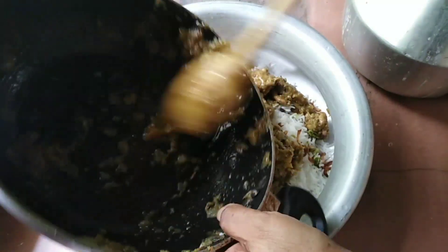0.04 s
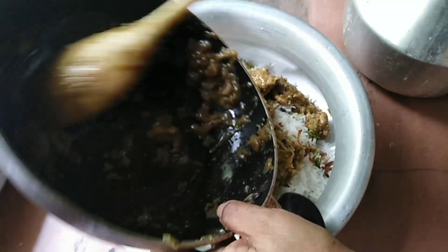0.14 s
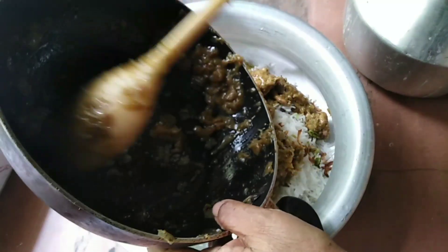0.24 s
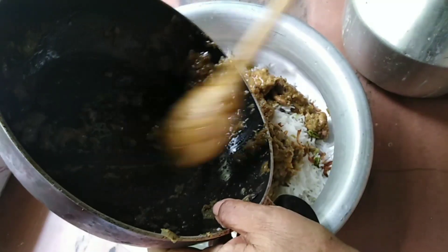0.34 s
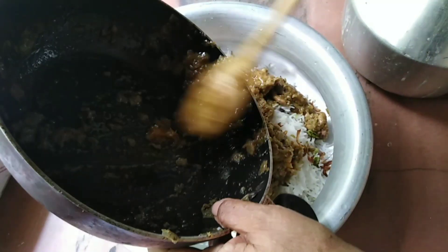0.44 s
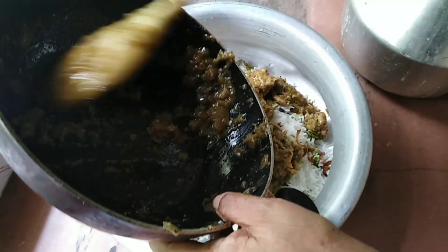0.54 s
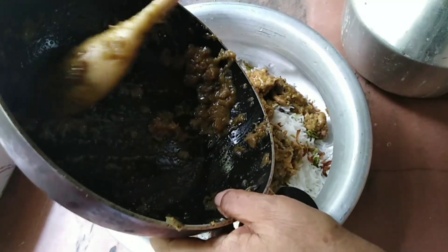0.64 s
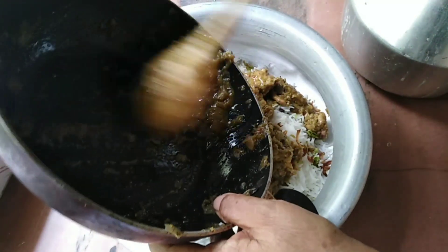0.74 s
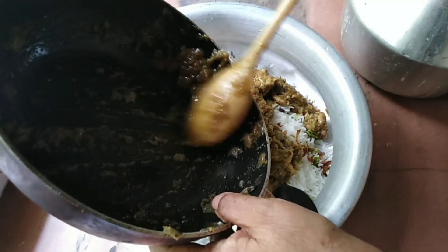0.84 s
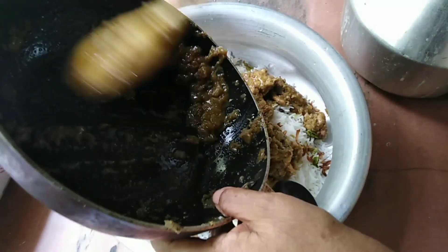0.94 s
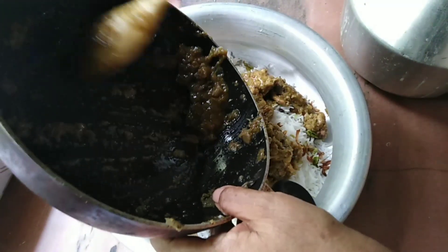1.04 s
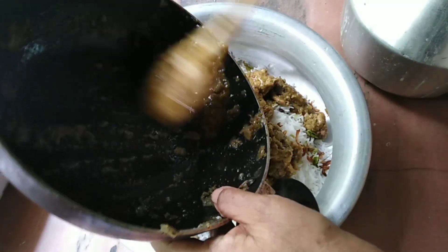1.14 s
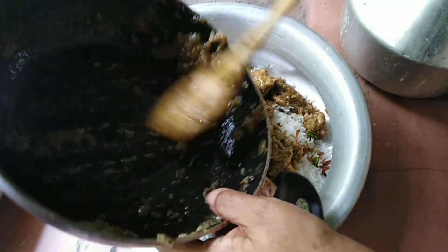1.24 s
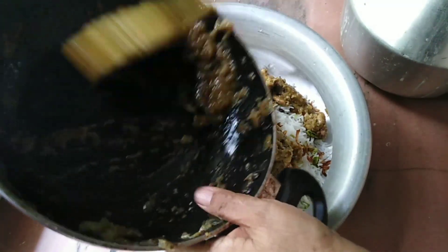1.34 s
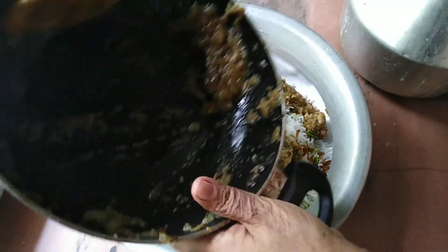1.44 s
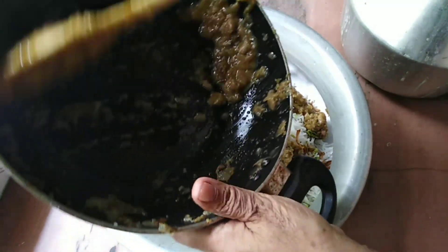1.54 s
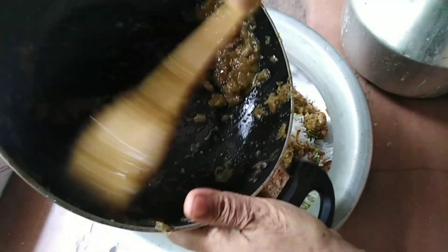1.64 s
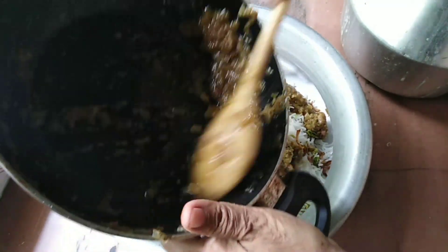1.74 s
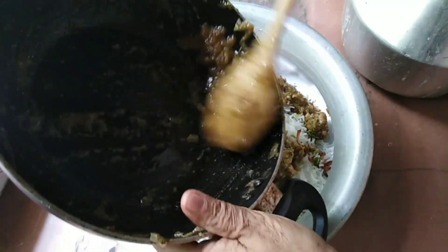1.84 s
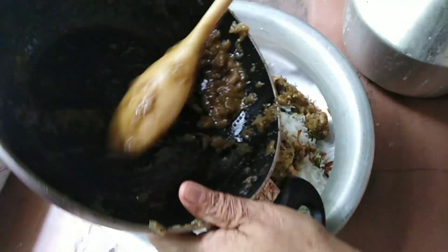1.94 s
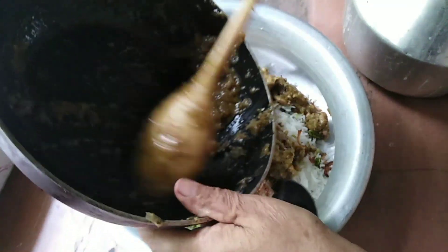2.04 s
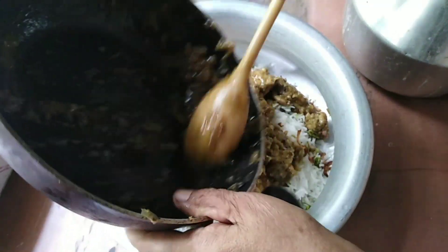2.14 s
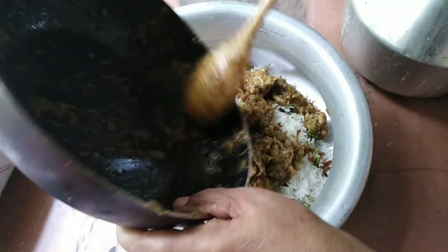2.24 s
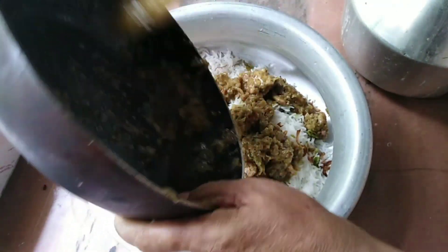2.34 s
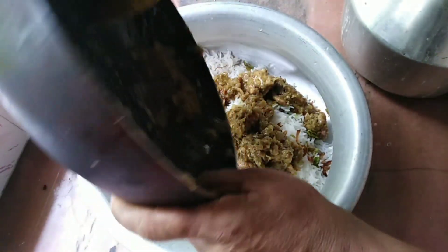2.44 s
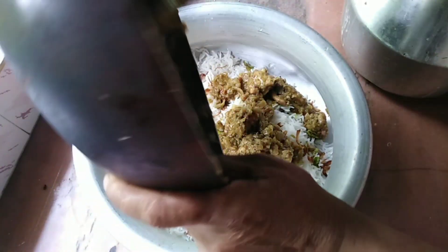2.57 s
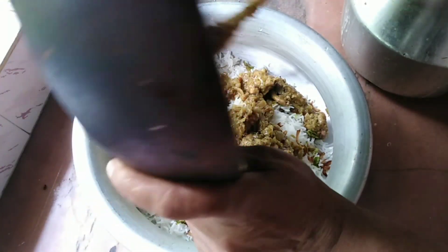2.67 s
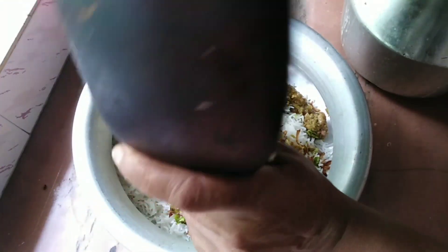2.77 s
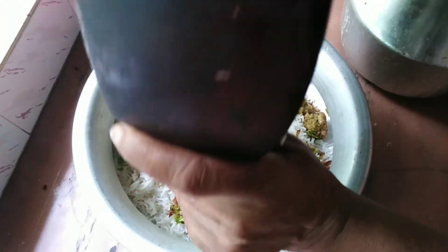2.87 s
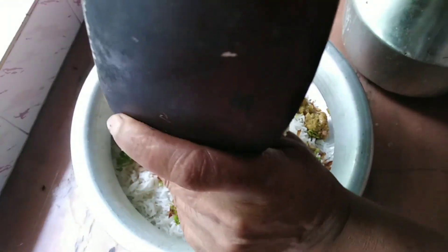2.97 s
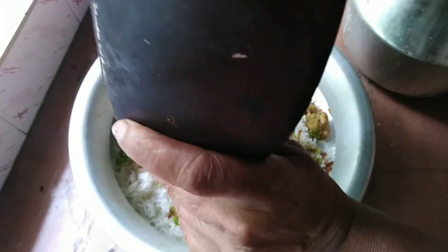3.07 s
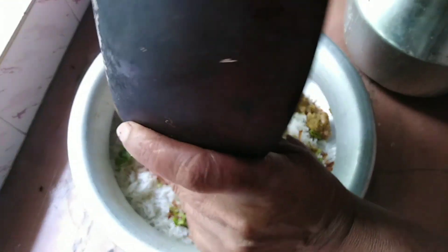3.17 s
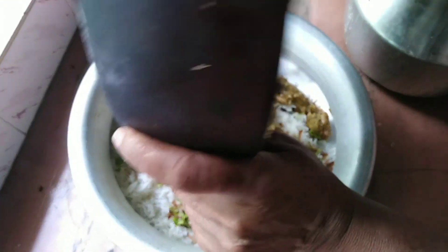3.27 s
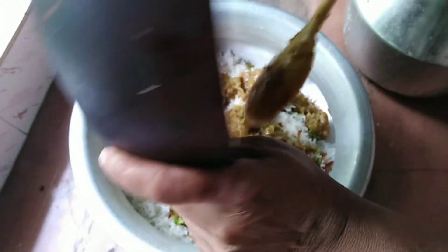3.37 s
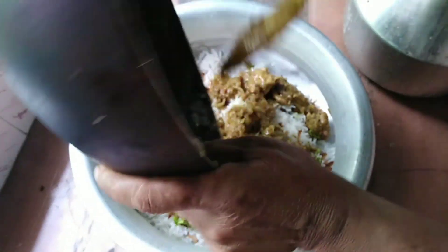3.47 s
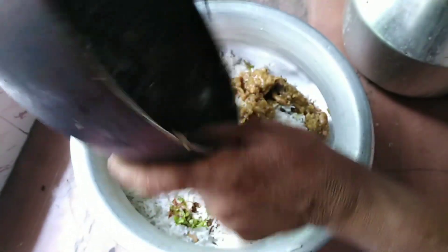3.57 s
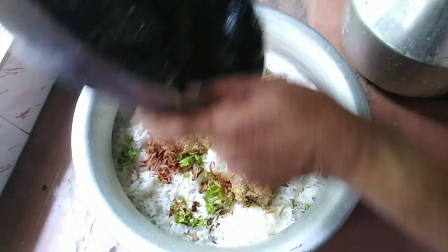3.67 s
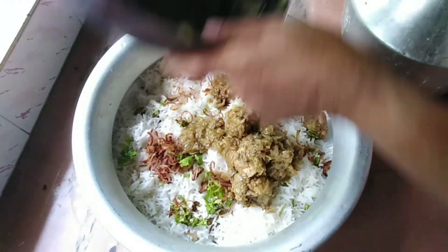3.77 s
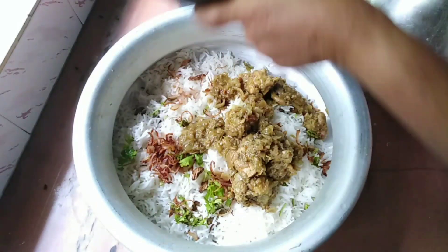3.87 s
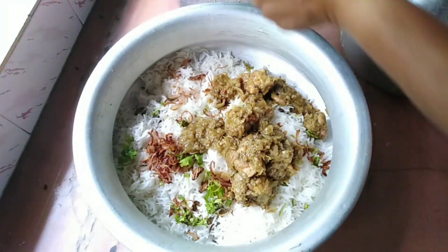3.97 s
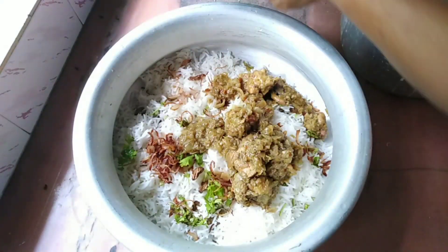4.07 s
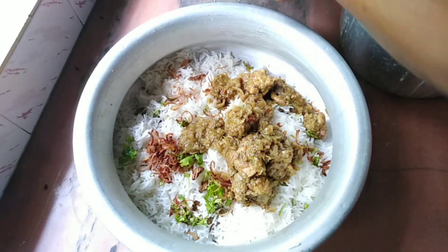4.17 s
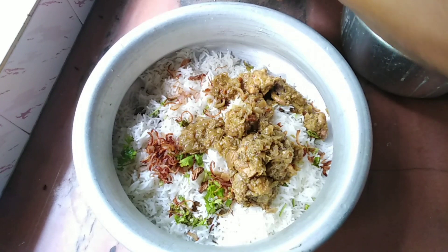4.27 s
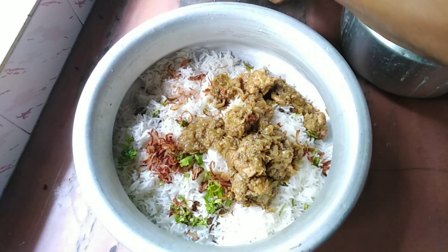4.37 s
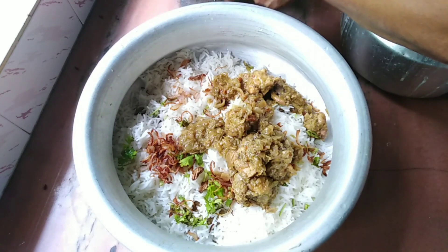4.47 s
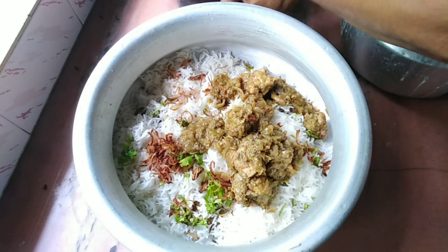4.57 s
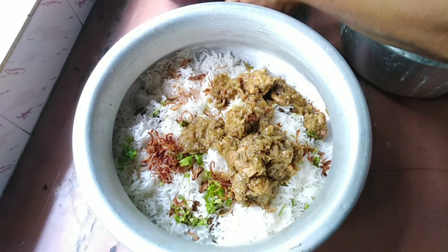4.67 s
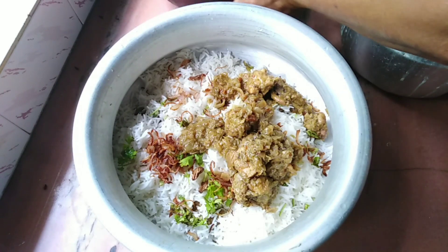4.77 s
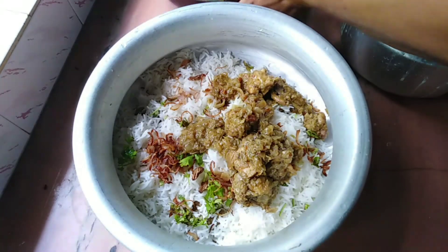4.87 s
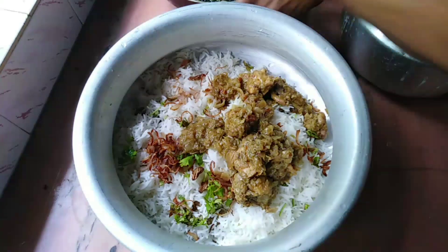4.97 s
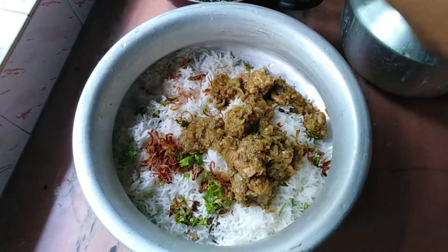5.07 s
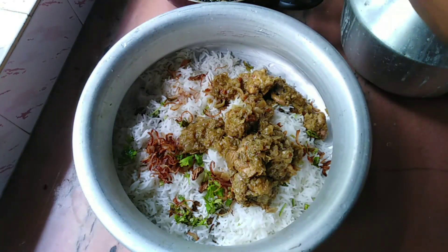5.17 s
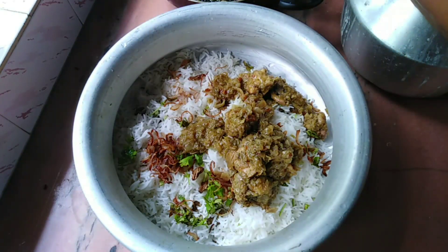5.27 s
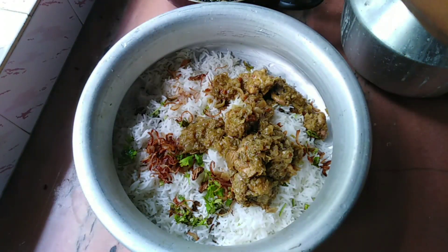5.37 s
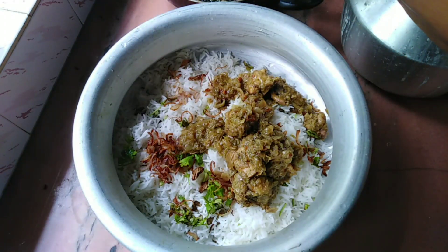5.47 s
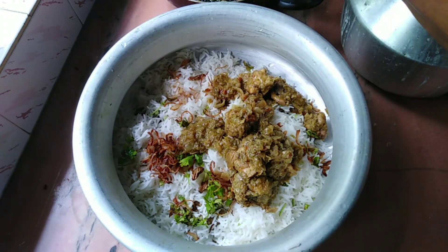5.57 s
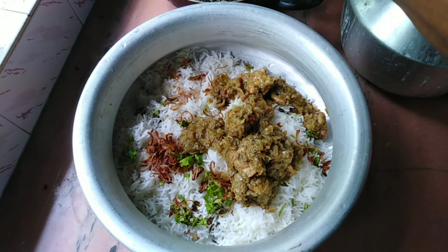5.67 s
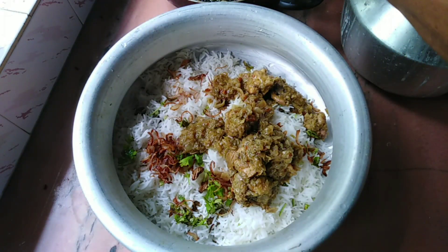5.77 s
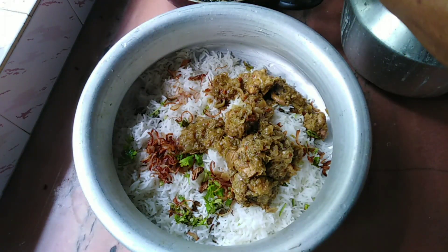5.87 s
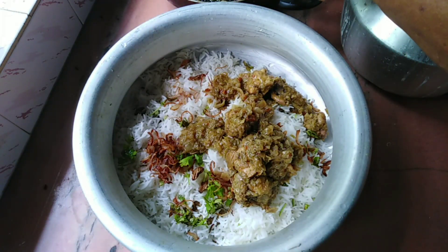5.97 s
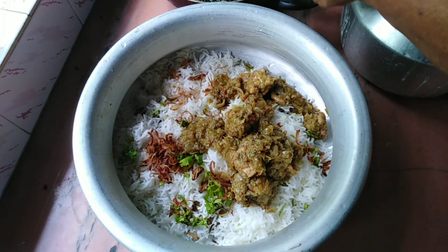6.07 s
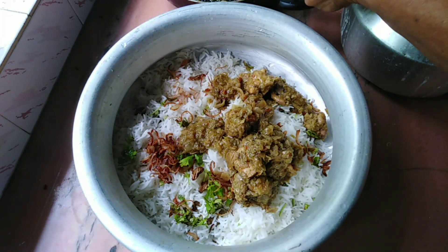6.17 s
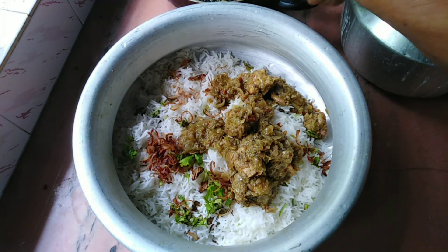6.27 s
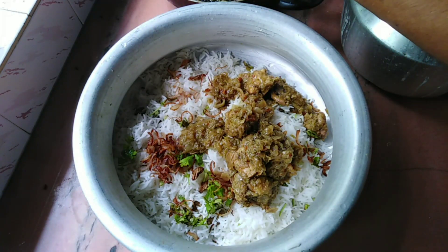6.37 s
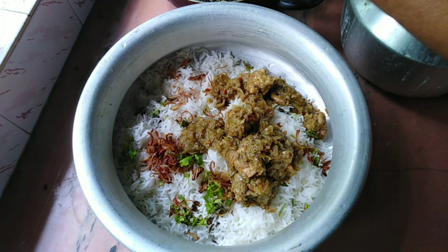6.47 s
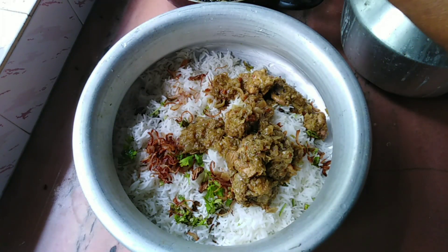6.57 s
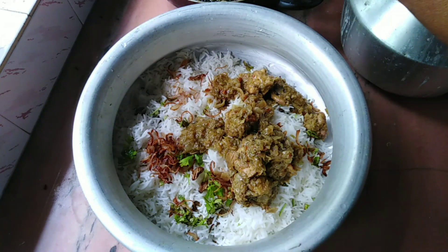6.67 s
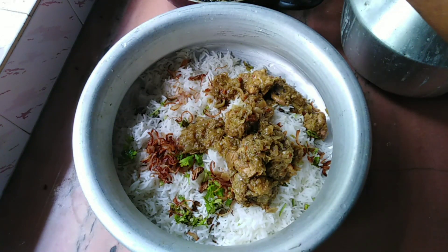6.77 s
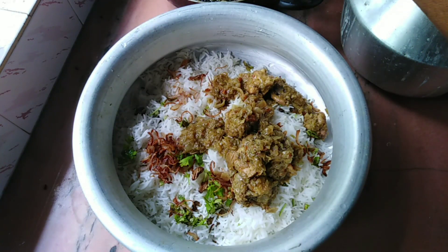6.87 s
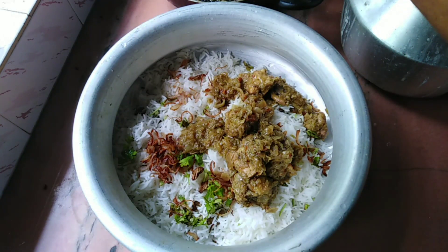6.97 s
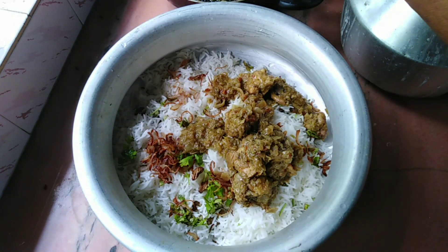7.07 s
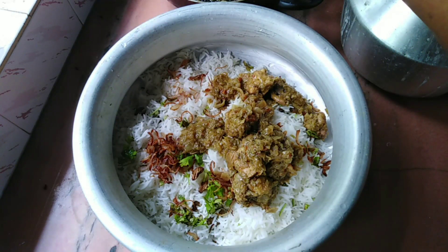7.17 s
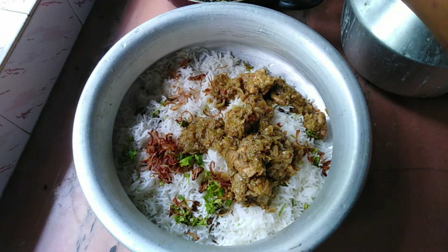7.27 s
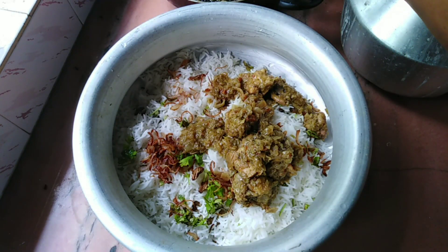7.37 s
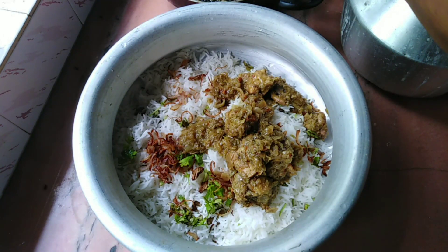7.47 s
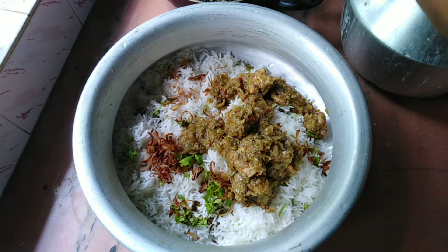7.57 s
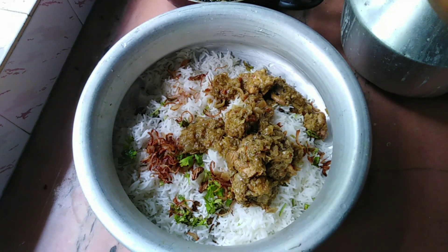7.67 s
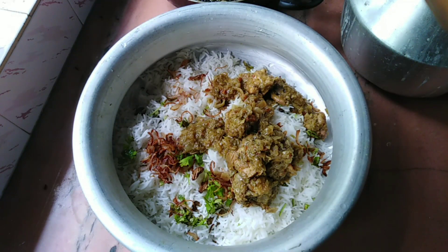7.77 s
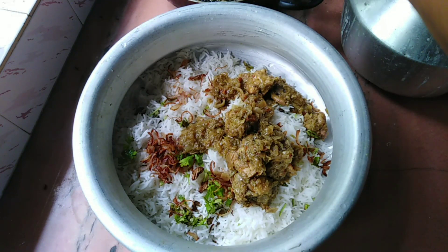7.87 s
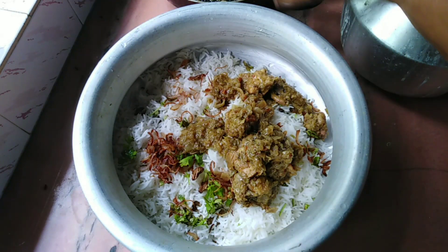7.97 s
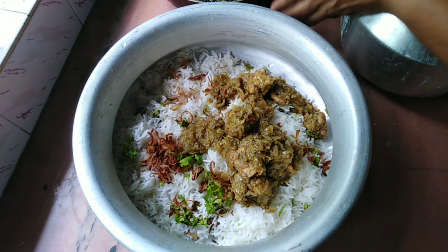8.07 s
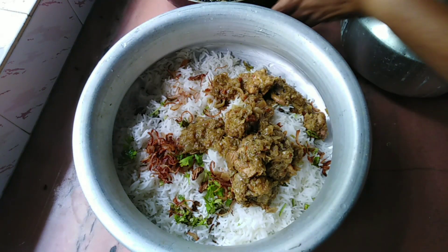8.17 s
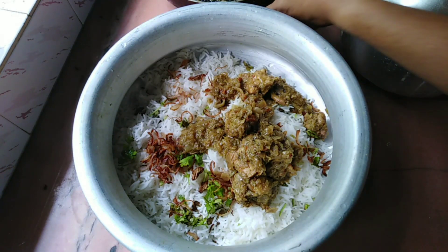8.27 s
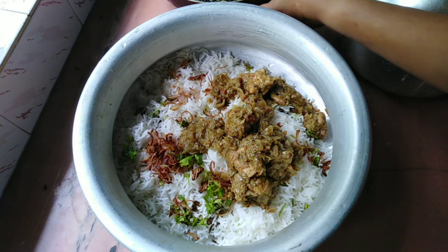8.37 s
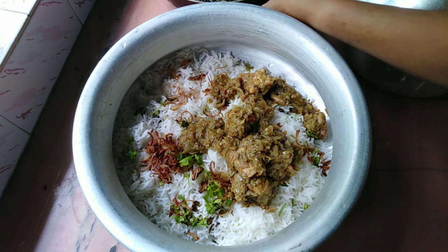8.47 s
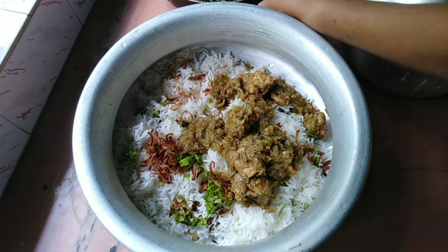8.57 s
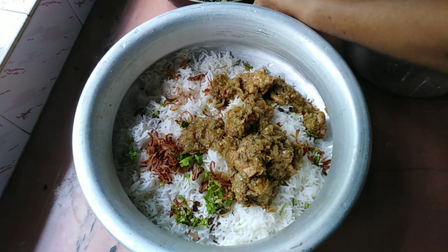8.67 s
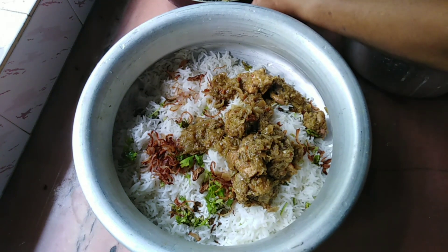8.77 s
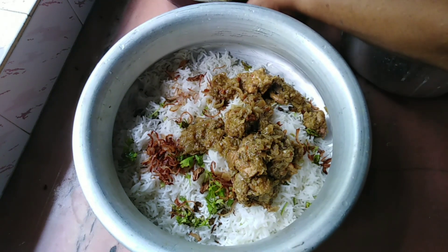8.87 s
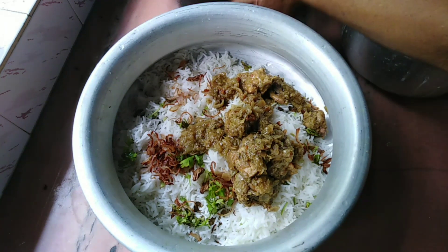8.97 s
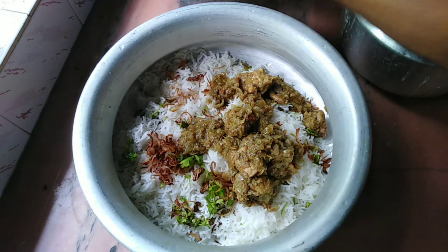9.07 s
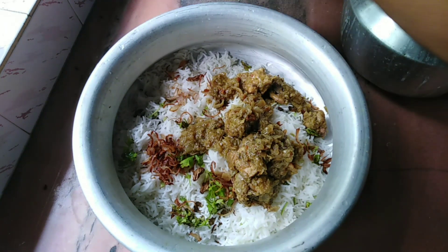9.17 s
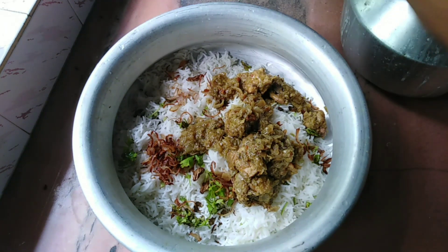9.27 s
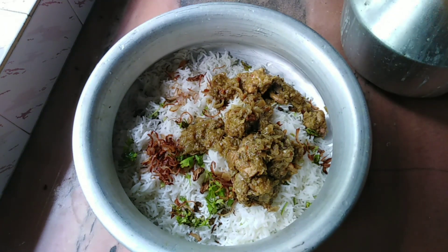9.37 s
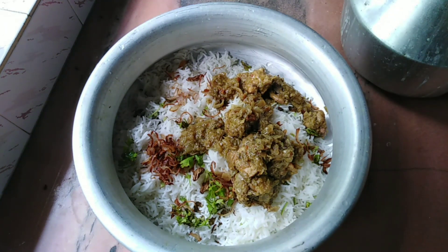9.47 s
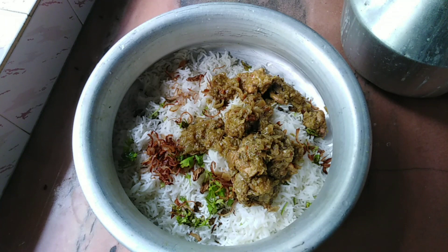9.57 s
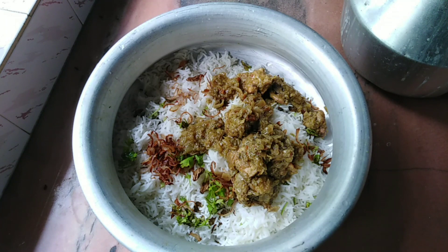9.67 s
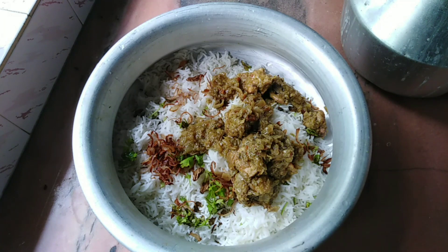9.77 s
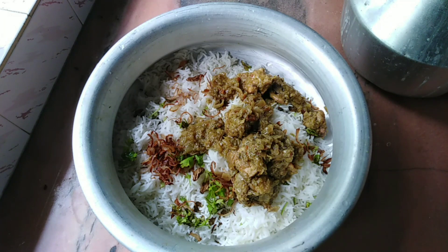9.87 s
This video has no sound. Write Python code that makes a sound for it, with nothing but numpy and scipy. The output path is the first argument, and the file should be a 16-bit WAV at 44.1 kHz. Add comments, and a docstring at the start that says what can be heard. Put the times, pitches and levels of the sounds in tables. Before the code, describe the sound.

A wooden spoon knocks and scrapes a metal pan, which lands on the floor with a clang and thump; later a steel utensil clinks and rattles.

```python
"""A wooden spoon knocks and scrapes food out of a metal pan over a pot of rice, close to a stereo pair of
microphones in a small hard-floored kitchen. The pan is set down on the floor with a clang and a thump; after some
quiet rustling a steel utensil clinks and rattles, and a light scrape begins again. A low hum lies under it all.
Blows set off decaying modes and short noise bursts, scraping drives modes with random slips, rustle is shaped
noise, squeaks are wobbling tones, and the room is a decaying noise tail."""
import sys
import numpy as np
from scipy import signal
from scipy.fft import rfft, irfft
from scipy.io import wavfile

SR = 44100
rng = np.random.default_rng(int(sys.argv[2]) if len(sys.argv) > 2 else 0)


def wav_record(signal):
    """Record a signal, one row per channel, as 16-bit PCM in the file named by sys.argv[1]."""
    frames = np.transpose(np.atleast_2d(signal))
    bounded = np.clip(frames, -1, 1)
    # unit amplitude maps onto the largest positive 16-bit level
    quanta = np.round(bounded * 32767).astype(np.int16)
    wavfile.write(sys.argv[1], SR, quanta)


N = 437472
TIME = np.arange(N) / SR
BLOW_LEN = SR * 3 // 5   # samples given to one blow or stroke
AGE = np.arange(BLOW_LEN) / SR   # seconds since its start
LANDING_S = 4.7222   # the pan's edge meets the floor
LANDING_TONE_HZ = 866   # loudest low tone of the landing, and the reference for the starting phases

# Pan's modes before food and spoon damp them: f/Hz, relative level/dB, t60/s
PAN_MODES = [(652,-15,.1),(753,-12,.12),(866,-6,.16),(874,-10,.45),(1140,-22,.1),(1390,-24,.12),(1699,-6,.22),(1770,-16,.1),(2040,-13,.07),
             (2746,-12,.28),(2774,-13,.18),(3520,-16,.2),(3565,-20,.13),(4170,-15,.19),(4510,-14,.22),
             (5730,-16,.18),(5830,-17,.18),(6520,-19,.16),(6760,-25,.25),(6970,-25,.19),(8630,-24,.22),(9350,-25,.18)]
# Spectrum of rough contact: f/Hz, relative level per Hz/dB
FRICTION_COLOUR = [(200,-11),(450,-6),(1000,0),(1800,-7.5),(3000,-7),(6000,-8.5),(9000,-17),(14000,-26.5)]
# Pan's base rocking down flat on the floor: t/s, relative level/dB
BASE_CONTACTS = [(5.0075,-5),(5.0123,-2.5),(5.0225,-7.5),(5.044,-19.5)]


def from_db(db):
    """Amplitude factor of a level in dB."""
    return 10 ** (np.asarray(db) / 20)


def rms_one(x):
    """Scale a sound to rms 1."""
    return x / np.sqrt(np.mean(x ** 2) + 1e-20)


def at_hz(points, hz):
    """Read a table on a log-frequency axis."""
    f, value = np.transpose(points)
    return np.interp(np.log(np.maximum(hz, 1)), np.log(f), value)


def fade(t60, hold=0):
    """Exponential decay by 60 dB in t60 seconds, after an optional hold."""
    return np.exp(-np.log(1000) * np.maximum(AGE - hold, 0) / t60)


def add(out, s, sound):
    """Mix a sound in at time s, cropped to the scene."""
    start = round(s * SR)
    sound = sound[..., max(-start, 0):]
    start = max(start, 0)
    out[:, start:start + sound.shape[-1]] += sound[..., :N - start]


def band(x, low_hz, high_hz):
    """Band-pass a sound."""
    return signal.sosfilt(signal.butter(2, [low_hz, high_hz], "band", fs=SR, output="sos"), x)


def noise(colour, size, alike_hz=900):
    """Coloured stereo noise of rms 1; the two sides are partly alike in the bass and unrelated high up."""
    hz = np.arange(size // 2 + 1) * SR / size
    mid, side = rfft(rng.standard_normal((2, size)))
    alike = 0.33 / (1 + (hz / alike_hz) ** 2)
    both = np.sqrt(1 + alike) * mid + np.sqrt(1 - alike) * side * [[1], [-1]]
    return rms_one(irfft(both * from_db(at_hz(colour, hz)), size))


def chance_curve(knots):
    """Random values at the knots, of spread 1 there, joined by straight lines over the age of a blow."""
    return np.interp(AGE, knots, rng.standard_normal(len(knots)))


def drift(rate):
    """Random curve over the whole scene with this many knots per second, of spread 1 at the knots."""
    knots = np.arange(0, N / SR + 1, 1 / rate)
    return np.interp(TIME, knots, rng.standard_normal(len(knots)))


def swell(t, rise, fall):
    """A push that builds up to time 0 and lets go; rise and fall are the times to 1/e."""
    shape = 1.25   # 1 is a pointed swell, 2 a rounded one
    return np.exp(-np.abs(t / np.where(t < 0, rise, fall)) ** shape)


def burst(colour, low_hz, high_hz, t60):
    """Dense, short-lived modes in one band, heard as a noise burst; rms about 1 at the start."""
    grain = noise(colour, size=BLOW_LEN)
    return band(grain * fade(t60), low_hz, high_hz) / np.std(band(grain, low_hz, high_hz))


def tone(hz, lag=0.00017):
    """A mode swells within a cycle and reaches the left microphone late, more out of step the higher it is."""
    skew = .85 * np.tanh(np.pi * hz * lag / .85) * (1 + .25 * rng.standard_normal())
    # modes in the same third of an octave start with the same polarity
    polarity = np.pi * np.round(3 * np.log2(hz / LANDING_TONE_HZ))
    phase = polarity + skew * np.array([[-1], [1]])
    onset = 1 - np.exp(-(2 * hz * AGE) ** 2)
    return np.sin(2 * np.pi * hz * AGE + phase) * onset


def waver(hz, half_hz):
    """Loose contact with hand, food and floor makes a mode flutter, the high ones most."""
    depth = (hz / half_hz) ** 1.3
    flutter = chance_curve(np.arange(0, 1, 1 / (.028 * hz)))
    return (1 + depth * flutter) / np.hypot(1, depth)


def ring(modes, length=1, scatter_db=2, detune=0.0043, flutter_hz=2500):
    """One blow on a body: strengths vary with the spot struck, and pitches a little with the grip."""
    scatter = scatter_db * rng.uniform(-1, 1, (len(modes), 2, 1))
    out = 0
    for (hz, db, t60), chance in zip(modes, scatter):
        mode = tone(hz * (1 + detune * rng.standard_normal()))
        out = out + from_db(db + chance) * mode * fade(t60 * length) * waver(hz, flutter_hz)
    return out


def muffled(modes, by_hz):
    """Food and spoon on the wall shorten the high modes most."""
    return [(hz, db, t60 / (1 + (hz / by_hz) ** 2)) for hz, db, t60 in modes]


def background(hum_hz=100.4, hum_db=-67, rumble_db=-67, waver_db=4.0):
    """A hum wavering in level and phase over low rumble and faint hiss."""
    # Rumble and hiss of the place: f/Hz, relative level per Hz/dB
    rumble_colour = [(25,-25),(50,-12.5),(80,2),(120,-3.5),(180,-5),(260,-23.5),(400,-31),(1000,-38),(3000,-40.5),(7000,-47),(14000,-34.5)]
    hum = np.sqrt(2) * np.sin(2 * np.pi * hum_hz * TIME + 0.19 * drift(5))
    hum = hum * from_db(hum_db + waver_db * drift(39))
    return hum + from_db(rumble_db) * noise(rumble_colour, size=N, alike_hz=500)


def rustle(rough_db=2.0, body_below_hz=2800):
    """Soft noise swells, hiss over body: mostly things being handled, and a hiss trailing the thump at 5.06 s."""
    # Soft swells, mostly rubbing, the one at 5.06 s trailing the thump:
    # peak t/s, rise/s, fall/s, level/dB, body against hiss/dB
    soft_swells = [(3.9,0.23,0.09,-83.5,20), (4.23,0.094,0.18,-70,3.5), (4.5,0.078,0.075,-71,-15),
                   (5.06,0.14,0.093,-48.5,2.5), (5.73,0.23,0.16,-65.5,2.5), (5.991,0.083,0.069,-52.5,-1),
                   (6.362,0.045,0.049,-60,4.5), (7.41,0.086,0.07,-67.5,4), (8.071,0.067,0.35,-60,-2),
                   (8.93,0.046,0.083,-67.5,-6.5), (9.601,0.1,0.14,-53,-25)]
    # Spectrum of the swells: f/Hz, relative level per Hz/dB
    rustle_colour = [(180, -56.5), (300, -25.5), (434, -5.5), (562, -12.5), (881, -12.5), (1200, -15),
                     (1360, -10), (2470, -11), (3240, -13.5), (6580, 2), (9070, -10.5), (14000, -5.5)]
    rough_noise = noise(rustle_colour, size=N) * from_db(rough_db * drift(220))
    hiss_level, body_level = np.zeros((2, 1, N))
    for s, rise, fall, db, body_db in soft_swells:
        lead = 3 * rise
        push = from_db(db) * swell(np.arange(-lead, 3 * fall, 1 / SR), rise, fall)
        add(hiss_level, s - lead, push)
        add(body_level, s - lead, push * from_db(body_db))
    hiss, body = band(rough_noise, body_below_hz, 18000), band(rough_noise, 150, body_below_hz)
    # the body is inverted so that the two do not cancel where they meet
    return hiss_level * hiss - body_level * body


def squeaks(wobble_hz=55):
    """Faint squeaks of things being shifted: short tones whose pitch strays at random."""
    # Squeaks: t/s, time from peak to 1/e/s, f/Hz, level/dB
    squeak_times = [(3.88,.1,690,-81), (3.95,.1,1560,-80), (6.6,.06,1260,-82), (6.83,.07,3400,-87)]
    out = np.zeros((2, N))
    stray_cycles = np.cumsum(wobble_hz * drift(200)) / SR
    for s, length, hz, db in squeak_times:
        t = np.arange(-2 * length, 2 * length, 1 / SR)
        phase = 2 * np.pi * (hz * t + np.interp(s + t, TIME, stray_cycles))
        add(out, s + t[0], from_db(db) * np.sqrt(2) * np.exp(-(t / length) ** 2) * np.sin(phase))
    return out


def clinks(ring_db=-1, crack_db=-4, crack_t60=0.16, snap_db=4, snap_t60=0.0024, treble_hz=3000):
    """Steel lands, bounces and rattles to rest: a few thin, clear modes over a crowd of uneven ones."""
    # Contacts, the glancing ones duller: t/s, level/dB, treble/dB, share of the free ring time
    contacts = [(7.184,-65,3.5,0.48), (7.299,-80,18,0.73), (7.585,-77.5,14.5,.4), (8.147,-28,12.5,0.5),
                (8.158,-36,4,0.53), (8.175,-27.5,-14,0.65), (8.187,-28,-9,0.86), (8.395,-41,-23.5,0.32),
                (8.506,-50.5,-15.5,0.27), (8.624,-46.5,-2.5,0.1505), (8.635,-54,-9,0.36),
                (8.702,-69,15,0.4), (8.715,-61,11,0.24), (8.727,-79,8,0.32), (8.929,-76,10,0.76)]
    # Steel utensil's clear modes: f/Hz, relative level/dB, free t60/s
    steel_modes = [(1163,-17,.36),(1560,-25,.12),(1873,-16,.23),(2030,-19,.25),(2340,-20,.2),(3117,-13,.34),(3496,-22,.3),(3898,-17,.15),(4753,-8,.23),(4820,-12,.18),
                   (5825,-15,.27),(5965,-17,.18),(6713,-6,.26),(7429,-20,.26),(8926,-22,.3),(11100,-25,.15)]
    # Spectrum of the steel's contact: f/Hz, relative level per Hz/dB
    steel_colour = [(71, -71), (120, 1), (172, 0.5), (352, -8), (665, 7), (1600, 5.5), (2850, -4),
                    (3080, -9.5), (6840, -4), (8340, -14), (14000, -17)]
    out = np.zeros((2, N))
    # many lesser modes 50 Hz apart, uneven by up to 9 dB, fully so from 1800 Hz upwards
    hz = np.arange(70, 14000, 50)
    unevenness_db = 9 * np.minimum(hz / 1800, 1) * rng.uniform(-1, 1, len(hz))
    crowd = np.column_stack([hz, at_hz(steel_colour, hz) + unevenness_db])
    for s, db, treble_db, length in contacts:
        crack = from_db(crack_db) * burst(crowd, 110, 13000, crack_t60)
        snap = from_db(snap_db) * burst(steel_colour, 3660, 8300, snap_t60)
        clear = from_db(ring_db) * ring(steel_modes, length, scatter_db=2, detune=0.0018, flutter_hz=10060)
        hit = from_db(db) * (crack + snap + clear)
        # the treble is inverted so that the two bands do not cancel where they meet
        add(out, s, band(hit, 60.4, treble_hz) - from_db(treble_db) * band(hit, treble_hz, 14000))
    return out


def boom():
    """The floor booms when the pan lands, and more when its base drops flat: one low mode set off twice."""
    # Low mode of the floor under the pan: f/Hz, relative level/dB, t60/s
    floor_mode = (150, -30.5, 0.33)
    out = np.zeros((2, N))
    add(out, LANDING_S, from_db(-12.5) * ring([floor_mode]))
    add(out, BASE_CONTACTS[0][0], from_db(1) * ring([floor_mode]))
    return band(out, 90, 2000)


def thumps(ring_db=-9, dull_db=-3, dull_t60=0.039):
    """The base drops flat in a few quick, dull contacts, each a soft-edged burst with a short ring."""
    # Modes of the base against the floor: f/Hz, relative level/dB, t60/s
    base_modes = [(171.5,-31.5,.39),(263,-21,.1),(410,-20,.06),(510,-20,.07),(740,-9,.07),(850,-5,.06),(1020,-2,.05),(1130,-9,.05)]
    # Spectrum of the dull contact: f/Hz, relative level per Hz/dB
    thump_colour = [(50,-26),(110,-16),(170,-12.5),(300,8.5),(850,13),(1150,10),(1380,-24),(2000,-9.5),(2600,-14),(5000,-20),(14000,-40)]
    out = np.zeros((2, N))
    for s, db in BASE_CONTACTS:
        onset = np.minimum(AGE / 0.0025, 1)
        dull = from_db(dull_db) * burst(thump_colour, 150, 14000, dull_t60) * onset
        add(out, s, from_db(db) * (dull + from_db(ring_db) * ring(base_modes, scatter_db=1.5)))
    return band(out, 120, 18000)


def landing_tone():
    """The landing's loudest low tone stays full for about 40 ms with a brief dip, then drops."""
    # The two stretches of the tone: t/s, level/dB, held/s, t60/s
    tone_parts = [(4.7222,-2,.005,.025), (4.739,-2.5,.019,.06)]
    out = np.zeros((2, N))
    for s, db, hold, t60 in tone_parts:
        add(out, s, from_db(db) * tone(LANDING_TONE_HZ, lag=.00006) * fade(t60, hold))
    return out


def landing(thud_db=-19, thud_t60=0.36, crack_db=-22, crack_t60=.07, bump_db=-29):
    """The pan's edge hits the floor: a clang of modes and mode clusters over a gritty thud."""
    # Pan's modes with its edge standing on the floor: f/Hz, level/dB, t60/s
    edge_modes = [(745,-14,0.28),(822,-18,.28),(868,-21,0.5),(1136,-27,.24),(1580,-28,.2),(1690,-14,0.18),(2755,-22,0.22),(2800,-28,.2),(3424,-39,0.2),(4231,-33,.22),(4520,-28,.26),(5792,-32,0.2)]
    # Crowded modes, each cluster a noise band: low f/Hz, high f/Hz, level/dB, t60/s
    mode_clusters = [(700,1020,-21,.45), (1600,1850,-27,.26), (2680,2880,-27,.29), (4200,4750,-29,.31),
                     (5680,6000,-33,.29)]
    out = np.zeros((2, N))
    add(out, LANDING_S, ring(edge_modes, scatter_db=1.5, detune=.001, flutter_hz=3600))
    add(out, LANDING_S, from_db(thud_db) * burst(FRICTION_COLOUR, 553, 1400, thud_t60))
    add(out, LANDING_S, from_db(bump_db) * burst(FRICTION_COLOUR, 150, 440, thud_t60))
    for low_hz, high_hz, db, t60 in mode_clusters:
        add(out, LANDING_S, from_db(db) * burst(FRICTION_COLOUR, low_hz, high_hz, t60))
    add(out, LANDING_S, from_db(crack_db) * burst(FRICTION_COLOUR, 1100, 11000, crack_t60))
    return out


def ticks(body_db=-4, snap_db=1, body_t60=0.043, snap_t60=0.024):
    """Light contacts of spoon, food and handling: a snap over a little body."""
    # Small ticks: t/s, relative snap level/dB, relative body level/dB, snap f/Hz
    tick_times = [(0.48,-36,-35,8300), (0.898,-24,-23.5,7500), (1.896,-37.5,-53,8200),
                  (1.931,-52,-80,12100), (1.995,-60,-79,8100), (2.234,-36.5,-47,10800),
                  (2.262,-42,-43,10000), (3.164,-32.5,-50,7700), (3.265,-39.5,-52,7710),
                  (5.266,-58,-76,6340), (5.403,-60,-53.5,6500), (6.508,-51.5,-68.5,7690),
                  (7.184,-46.5,-69.5,7750), (7.298,-63,-76,7650), (7.705,-54.5,-85.5,7670)]
    out = np.zeros((2, N))
    for s, snap, body, hz in tick_times:
        add(out, s, from_db(body + body_db) * burst(FRICTION_COLOUR, 280, 4100, body_t60))
        add(out, s, from_db(snap + snap_db) * burst(FRICTION_COLOUR, 0.77 * hz, 1.42 * hz, snap_t60))
    return out


def grains(per_s, spread_db, size):
    """Random slips of either sign, a few much stronger than the rest."""
    strength = from_db(spread_db * np.minimum(rng.exponential(1, size), 4))
    return (rng.random(size) < per_s / SR) * rng.choice([-1, 1], size) * strength


def driven(drive, modes, clang_db, flare_s=.012, flare_db=5):
    """Slips keep a body's modes sounding; each flares and sinks as the spoon travels. rms follows the drive."""
    out, power = 0, 0
    knots = np.arange(0, 1, flare_s)
    for hz, db, t60 in modes:
        extra_db = clang_db * (1600 < hz < 1850)   # the clang's own band
        strength = from_db(db + extra_db) * np.sqrt(t60)
        flare = from_db(flare_db * chance_curve(knots))
        answer = signal.fftconvolve((drive * flare)[None], tone(hz) * fade(t60), axes=1)[:, :BLOW_LEN]
        out = out + strength * rms_one(answer * waver(hz, 6000))
        power = power + strength ** 2
    return out * np.std(drive) / np.sqrt(power)


def tilted(x, db_per_octave, pivot_hz):
    """Brighten or dull a sound about a pivot, with the tilt levelling off below 300 and above 7000 Hz."""
    hz = np.clip(np.arange(BLOW_LEN + 1) * SR / (2 * BLOW_LEN), 300, 7000)
    return irfft(rfft(x, 2 * BLOW_LEN) * from_db(db_per_octave * np.log2(hz / pivot_hz)))[:, :BLOW_LEN]


def wander(x, depth=0.021):
    """A resonance shifts as the contact point moves: the sound is read at a varying speed."""
    speed = 1 + depth * drift(35)[:BLOW_LEN]
    return np.array([np.interp(np.cumsum(speed), np.arange(BLOW_LEN), side) for side in x])


def clumped(colour, clump_db=2.0):
    """Coarse grit: each band of noise comes in clumps of its own."""
    sources = [noise(colour, size=BLOW_LEN) for _ in range(2)]
    edges = np.geomspace(150, 15000, 15)
    knots = np.arange(0, 1, .009)
    out = 0
    for k, (low_hz, high_hz) in enumerate(zip(edges, edges[1:])):
        # neighbouring bands draw on different noises
        out = out + band(sources[k % 2], low_hz, high_hz) * from_db(clump_db * chance_curve(knots))
    return rms_one(out)


def scrapes(rub_db=-2, grit_t60=0.017, pivot_hz=1800, catch_db=2.5):
    """The spoon sticks and slips: slips drive the pan's free modes, those under the spoon and rattling grit."""
    # Spoon strokes, each a swell of pressure, and at 2.541 s a dull second contact after a knock:
    # peak t/s, rise/s, fall/s, relative level/dB, brightness/(dB per octave), free ring/dB,
    # pressed ring/dB, extra clang/dB
    strokes = [(.01,.026,0.035,-31.5,1.5,2,-3,0.5), (.408,0.039,0.026,-36,3.5,5,0.5,-3),
               (.835,0.054,0.033,-33,2,4,6.5,-8), (1.2,0.0071,0.011,-35,-0.5,8.5,10.5,0.5),
               (1.234,0.031,0.03,-32,1,3,7,3.5), (1.58,.039,0.046,-36.5,0.5,-4,-13.5,3),
               (1.681,0.025,0.043,-30,-0.5,-1.5,-18,3), (1.757,.023,0.019,-29.5,1,-0.5,-22.5,4.5),
               (2.228,0.034,0.027,-34,2,-5,-15,-12), (2.541,.012,0.03,-39.5,-4.5,3.5,-7,-3.5),
               (2.652,.038,0.031,-33,0.5,-3.5,-16,-7.5), (3.059,0.045,0.068,-42.5,1,-0.5,-19,-5.5),
               (3.369,.027,0.044,-38.5,1,-8,-16,-5), (9.535,0.041,0.084,-67,3,4.5,-10.5,3.5),
               (9.655,0.015,0.033,-56.5,1,0.5,-6,9), (9.85,.039,0.073,-59.5,6.5,8.5,-2.5,1)]
    # Wall's modes right under the spoon, damped and pushed up in pitch: f/Hz, relative level/dB, t60/s
    pressed_modes = [(925,3,.045), (1760,-1,.04), (2790,-3,.04), (3560,-7,.035), (4200,-9,.03),
                     (4520,-9,.03), (5850,-8,.025)]
    # Grit between spoon and wall: f/Hz, relative level per Hz/dB
    grit_colour = [(100,-34.5),(220,-15),(450,-2.5),(650,5),(1000,-5.5),(1450,-2),(2000,-7.5),(3000,-16),(4300,-11.5),(5000,-16),(5900,-9.5),(9000,-18.5),(14000,-25)]
    slips_per_s, slip_spread_db, rubbed_ring = 1000, 2.2, .45   # the last is a share of the free ring time
    out = np.zeros((2, N))
    # the whole stroke judders as the spoon catches
    catches = catch_db * drift(90)
    free_modes = [(hz, level, t60 * rubbed_ring) for hz, level, t60 in muffled(PAN_MODES, by_hz=8400)]
    puff = fade(grit_t60) ** 2
    for s, rise, fall, db, bright, ring_db, spoon_db, clang_db in strokes:
        lead = 2 * rise
        onset = np.minimum(2 * AGE / rise, 1)
        judder = from_db(np.interp(s - lead + AGE, TIME, catches))
        pressure = onset * swell(AGE - lead, rise, fall) * judder
        drive = rms_one(grains(slips_per_s, slip_spread_db, size=BLOW_LEN)) * pressure
        # every slip lets out a short puff of grit
        grit_power = np.abs(signal.fftconvolve(drive ** 2, puff / puff.sum())[:BLOW_LEN])
        grit = clumped(grit_colour) * np.sqrt(grit_power)
        wall = driven(drive, free_modes, clang_db)
        pressed = wander(driven(drive, pressed_modes, clang_db))
        stroke = from_db(rub_db) * grit + from_db(ring_db) * wall + from_db(spoon_db) * pressed
        add(out, s - lead, from_db(db) * tilted(stroke, bright, pivot_hz))
    return out


def knocks(crack_db=-1, rim_db=-7, crack_t60=0.033, thud_db=-3, thud_t60=0.11, snap_db=3, snap_t60=0.0031,
           snap_clang_share=0.091, push_db=-60, push_t60=0.17):
    """Spoon on pan: a crack, a thud of the wall, a low push of the whole pan, and the ring of its modes."""
    # Blows, the spot struck deciding which modes speak: t/s, then relative levels: thud/dB, crack/dB, treble/dB,
    # left over right/dB, factor on the ring time, rim tone/dB, clang/dB, ping/dB, chime/dB, shimmer/dB
    blows = [(0.27,-13.5,-20.5,-15,4,0.91,-8.5,-25.5,-15,-13,-25.5),
             (0.707,-18.5,-18,-19.5,3,0.69,-15.5,-24.5,-16,-27.5,-12.5),
             (1.148,-29.5,-25,-41.5,-1,1.04,-24,-24.5,-26,-26,-24.5),
             (1.497,-29,-23.5,-16,1,0.94,-19,-26.5,-33,-12.5,-19.5),
             (2.075,-39.5,-27.5,-41,0.5,1.04,-24,-24,-25.5,-28,-26),
             (2.163,-31.5,-20.5,-30,1,0.56,-15,-24,-39,-18,-24.5),
             (2.505,-21.5,-18,-22,2,0.86,-18.5,-36.5,-27.5,-18,-32),
             (2.914,-24,-8.5,-17,-1.5,0.94,-17,-8.5,-15,-6,-16.5),
             (3.309,-28,-15,-27,2,0.86,-19,-14,-20,-10,-16)]
    # only a heavy blow pushes the whole pan: thud of an ordinary blow, dB of push per dB of thud
    ordinary_blow_db, push_growth = -22.5, 2.6
    rings, cracks = np.zeros((2, 2, N))
    for s, thud, wood, treble, pan_db, length, rim, clang, ping, chime, shimmer in blows:
        # excitation over pitch (Hz, dB)
        strike = [(450, thud), (750, rim), (900, rim), (1400, wood), (1690, clang), (1780, clang), (2040, wood),
                  (2740, ping), (2780, ping), (3500, chime), (3600, chime), (4150, shimmer), (4550, shimmer),
                  (5700, treble)]
        sides = from_db(np.array([[pan_db], [-pan_db]]) / 2)
        modes = [(hz, db + at_hz(strike, hz), t60) for hz, db, t60 in muffled(PAN_MODES, by_hz=8350)]
        add(rings, s, sides * ring(modes, length, scatter_db=0.5, detune=0.0054, flutter_hz=4440))
        crack = from_db(rim + rim_db) * burst(FRICTION_COLOUR, 430, 1150, crack_t60)
        crack = crack + from_db(wood) * burst(FRICTION_COLOUR, 1250, 2460, crack_t60)
        crack = crack + from_db(treble) * burst(FRICTION_COLOUR, 4000, 19845, crack_t60)
        # the first instant of contact is the sharpest
        snap_level_db = treble + snap_clang_share * (wood - treble) + snap_db
        crack = crack + from_db(snap_level_db) * burst(FRICTION_COLOUR, 330, 9000, snap_t60)
        add(cracks, s, sides * from_db(crack_db) * crack)
        add(cracks, s, from_db(thud + thud_db) * burst(FRICTION_COLOUR, 260, 660, thud_t60))
        push_level_db = push_db + push_growth * (thud - ordinary_blow_db)
        add(cracks, s, from_db(push_level_db) * burst(FRICTION_COLOUR, 25, 200, push_t60))
    return rings, cracks


def kitchen(x, first_echo=0.0012, build_up=0.004):
    """Dense reflections off floor and walls: a noise tail dying band by band."""
    # Reverberation of the room: f/Hz, t60/s
    room_t60 = [(150,0.65),(400,0.48),(1000,0.41),(3000,.38),(7000,0.39),(14000,0.46)]
    white = noise([(100, 0), (10000, 0)], size=BLOW_LEN, alike_hz=808.3)
    edges = np.geomspace(70, 18000, 9)
    tail = 0
    for low_hz, high_hz in zip(edges, edges[1:]):
        tail = tail + band(white, low_hz, high_hz) * fade(at_hz(room_t60, np.sqrt(low_hz * high_hz)))
    tail = tail * np.clip((AGE - first_echo) / build_up, 0, 1)
    return signal.fftconvolve(x, tail / np.sqrt(np.sum(tail ** 2) / 2), axes=1)[:, :N]


def scene():
    """The pan is close to the microphones; things on the floor are further off and wetter."""
    rings, cracks = knocks()
    held, clang, thump, clink, tick, scrape = landing_tone(), landing(), thumps(), clinks(), ticks(), scrapes()
    direct = boom() + rings + cracks + held + clang + thump + clink + tick + scrape
    to_room = from_db(-15.0) * rings + from_db(-5.5) * cracks + from_db(-5.5) * tick + from_db(-8.0) * scrape
    to_room = to_room + from_db(-4.5) * clang + from_db(-4.5) * thump + from_db(-3.5) * clink
    to_room = to_room + from_db(-21) * held
    balance = from_db([[-.7], [.7]])   # left, right
    return (direct + kitchen(to_room) + rustle() + squeaks()) * balance + background()


def record(dry, left_air_db=-3, right_air_db=4, cutoff_hz=14600):
    """The right microphone is brighter; peaks are rounded, the deepest bass and the top are cut."""
    air = signal.sosfilt(signal.butter(1, 9000, "high", fs=SR, output="sos"), dry)
    coloured = dry + air * (from_db([[left_air_db], [right_air_db]]) - 1)
    rounded = coloured / (1 + coloured ** 4) ** (1 / 4)
    rounded = signal.sosfilt(signal.butter(2, 32, "high", fs=SR, output="sos"), rounded)
    return signal.sosfilt(signal.ellip(10, .2, 80, cutoff_hz, fs=SR, output="sos"), rounded)


dry = scene()
out = record(dry)
wav_record(out)
```